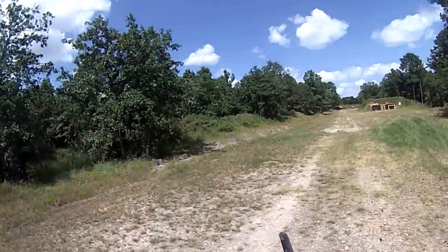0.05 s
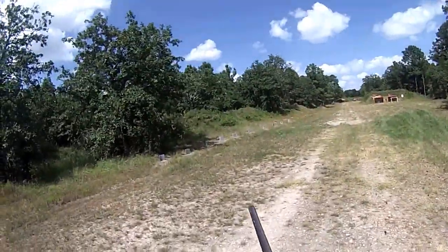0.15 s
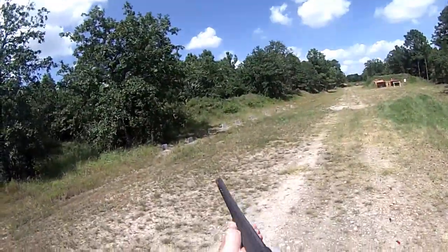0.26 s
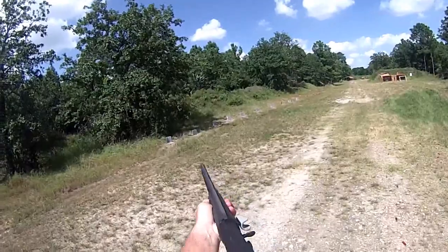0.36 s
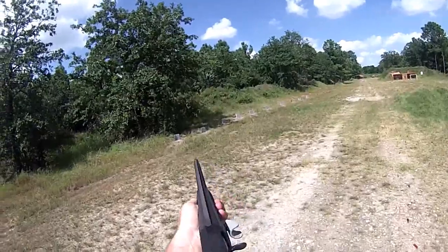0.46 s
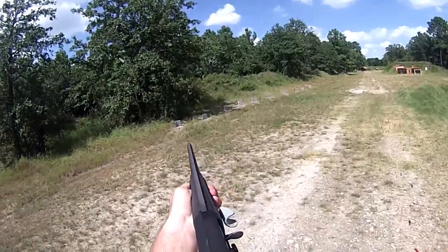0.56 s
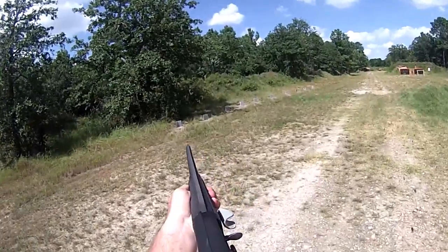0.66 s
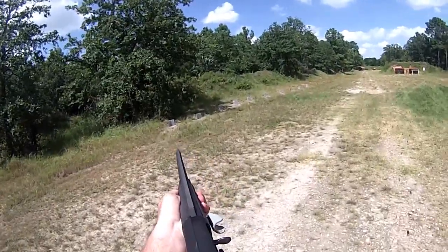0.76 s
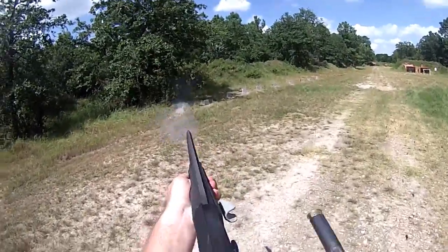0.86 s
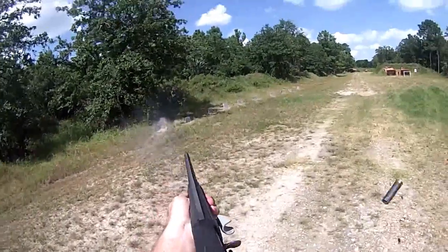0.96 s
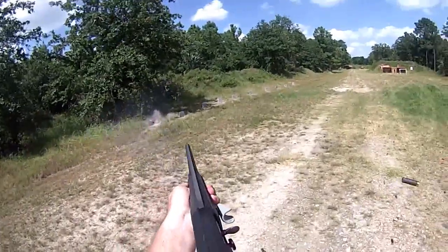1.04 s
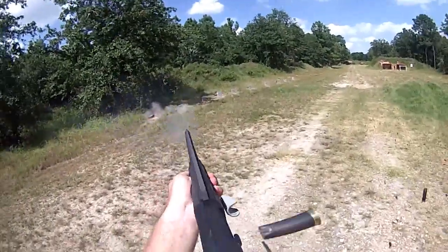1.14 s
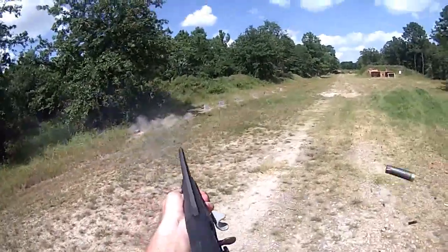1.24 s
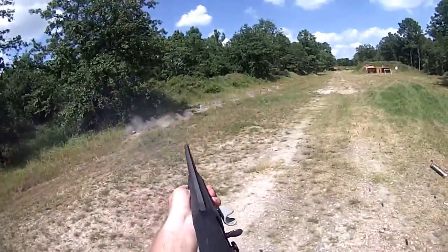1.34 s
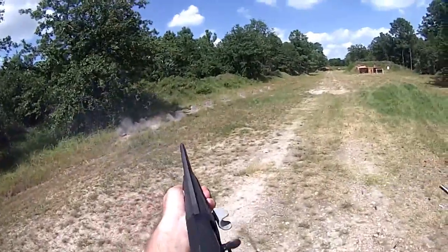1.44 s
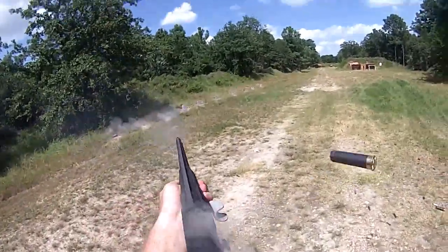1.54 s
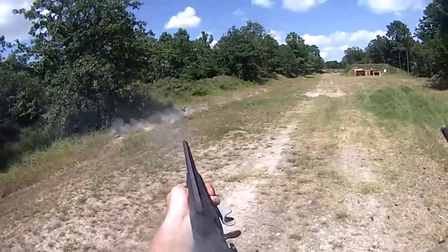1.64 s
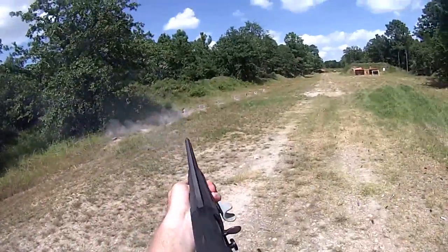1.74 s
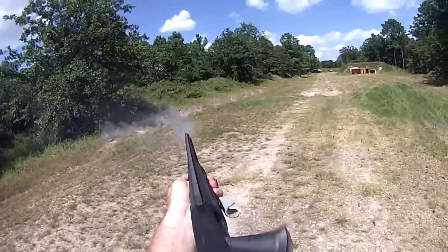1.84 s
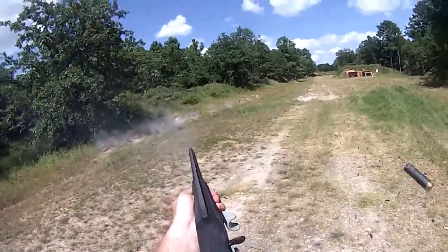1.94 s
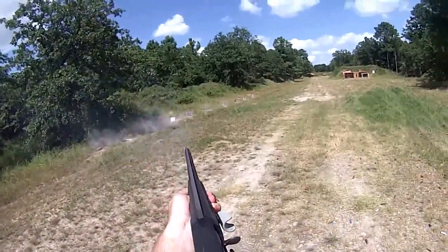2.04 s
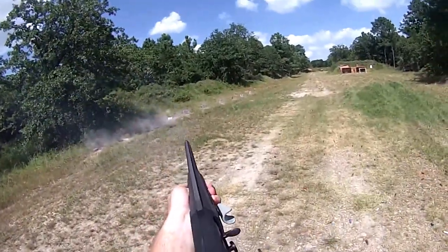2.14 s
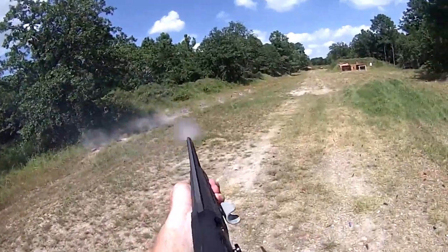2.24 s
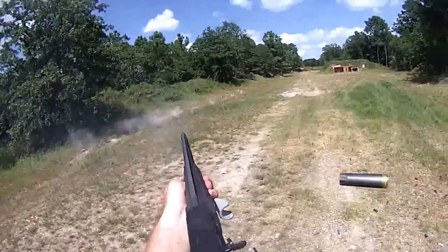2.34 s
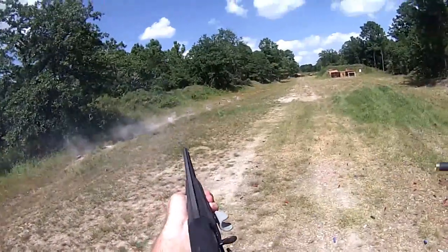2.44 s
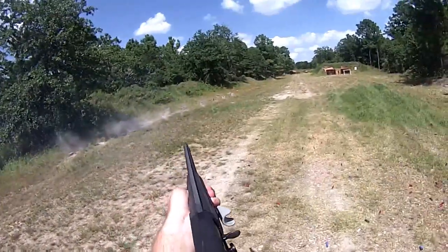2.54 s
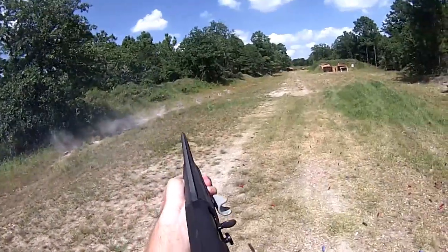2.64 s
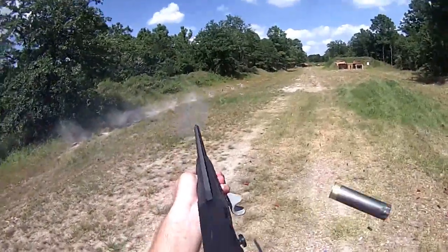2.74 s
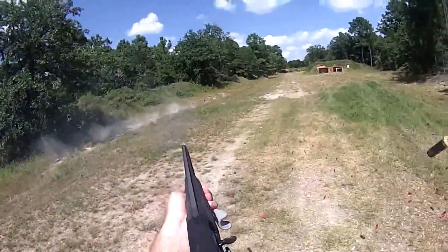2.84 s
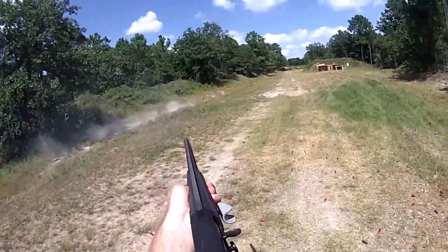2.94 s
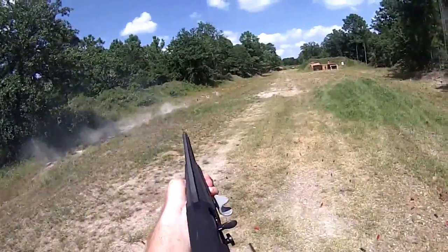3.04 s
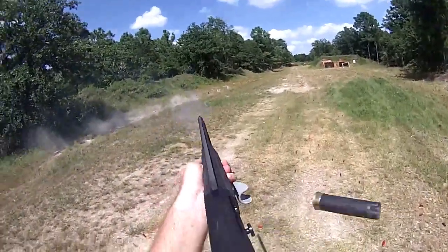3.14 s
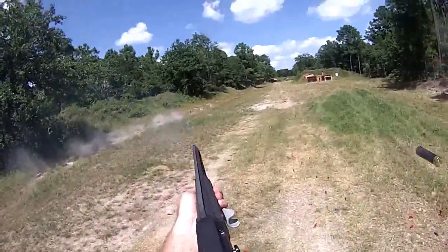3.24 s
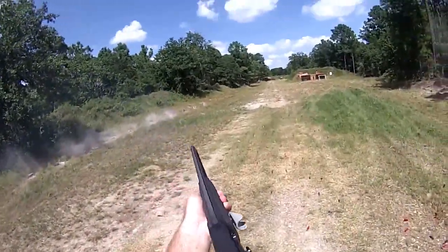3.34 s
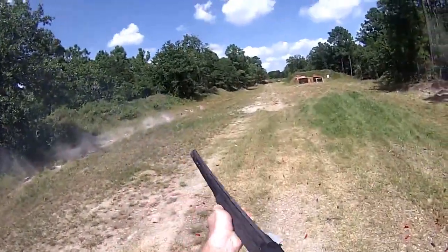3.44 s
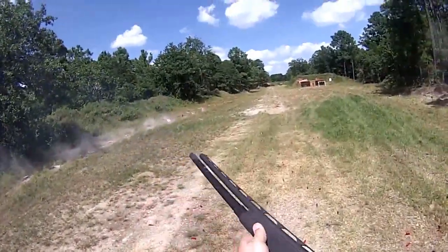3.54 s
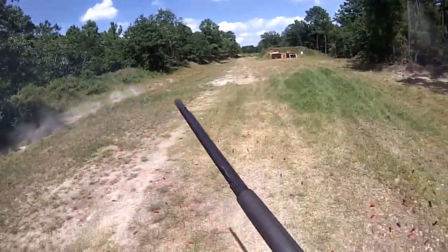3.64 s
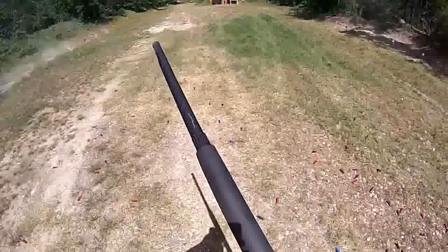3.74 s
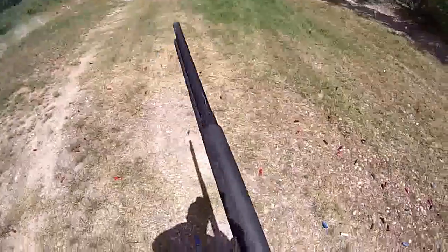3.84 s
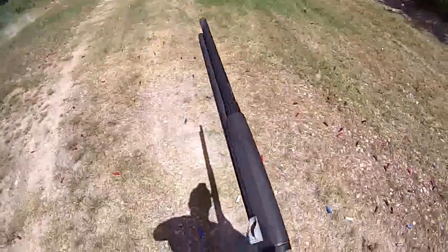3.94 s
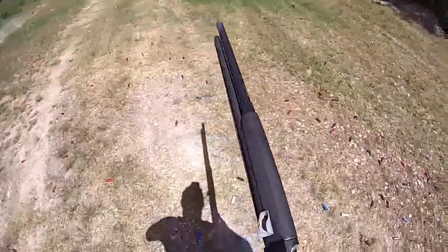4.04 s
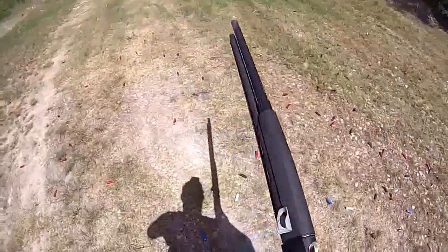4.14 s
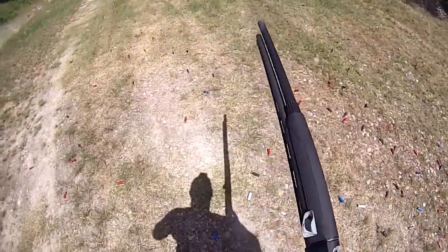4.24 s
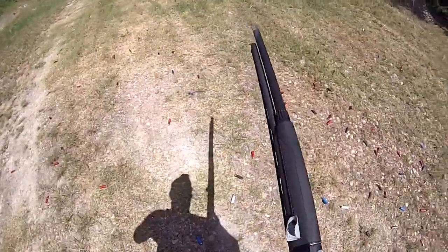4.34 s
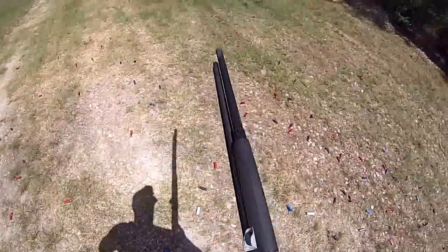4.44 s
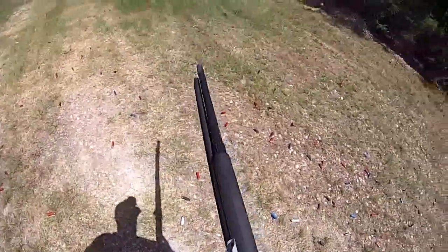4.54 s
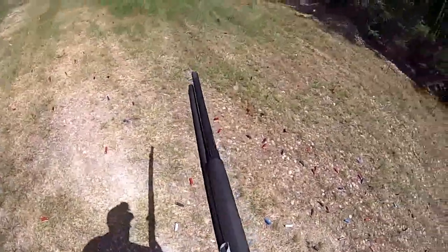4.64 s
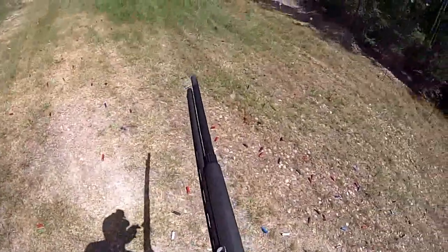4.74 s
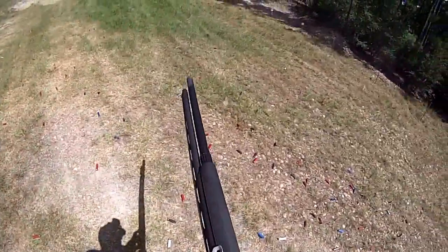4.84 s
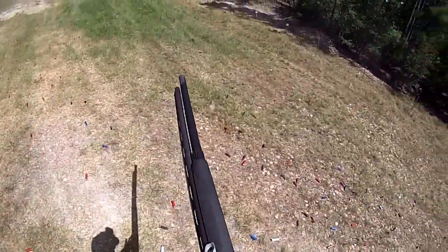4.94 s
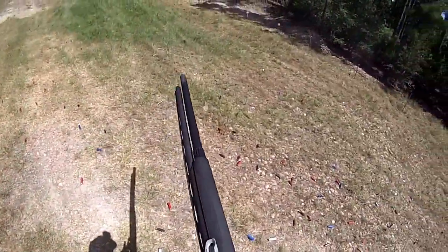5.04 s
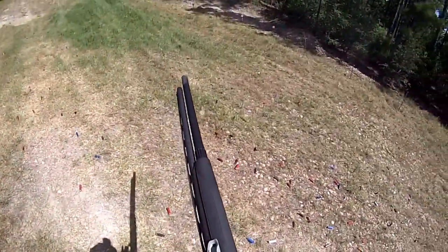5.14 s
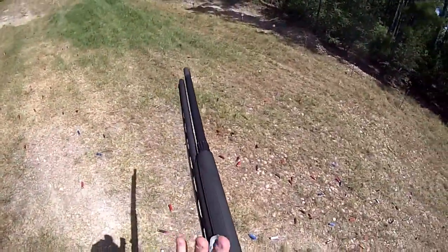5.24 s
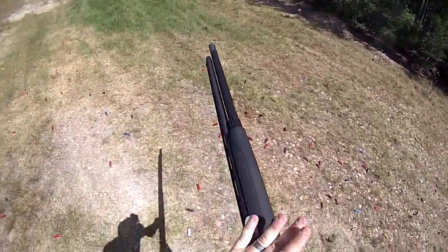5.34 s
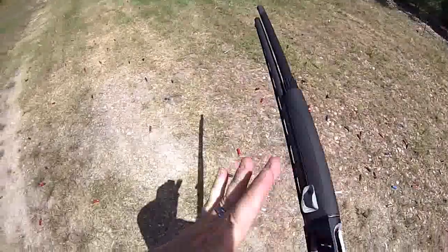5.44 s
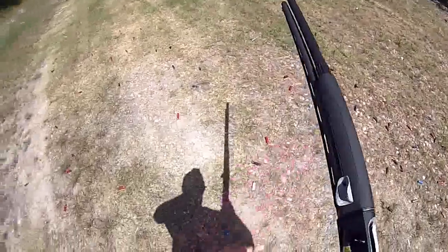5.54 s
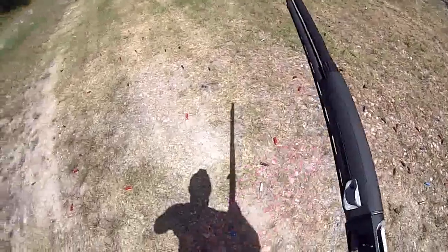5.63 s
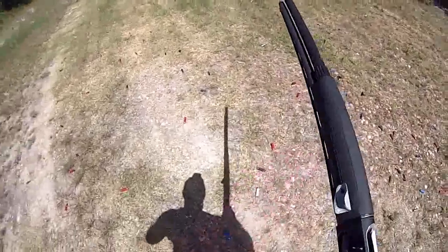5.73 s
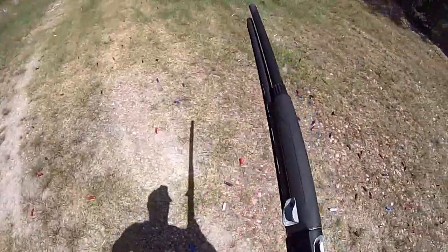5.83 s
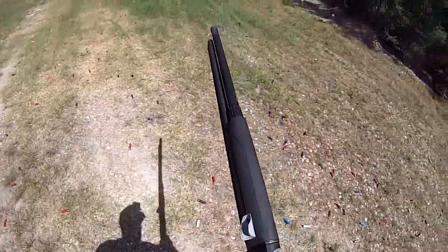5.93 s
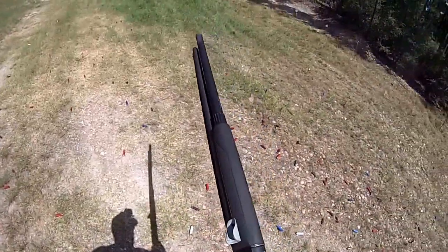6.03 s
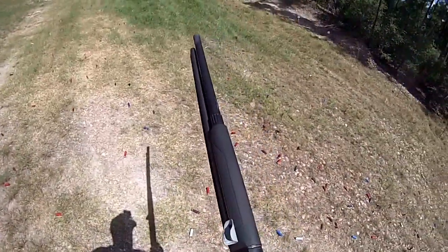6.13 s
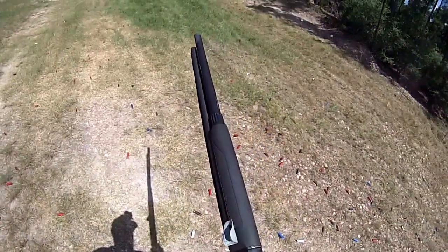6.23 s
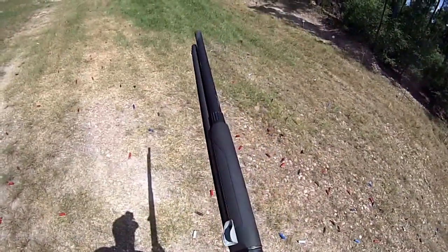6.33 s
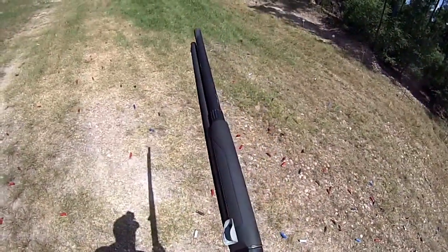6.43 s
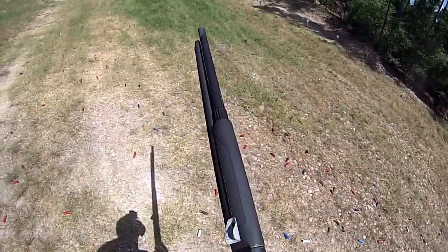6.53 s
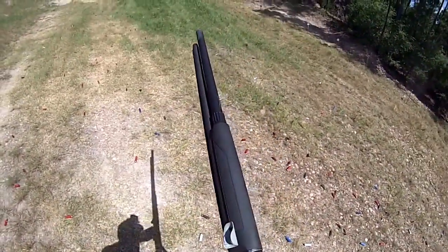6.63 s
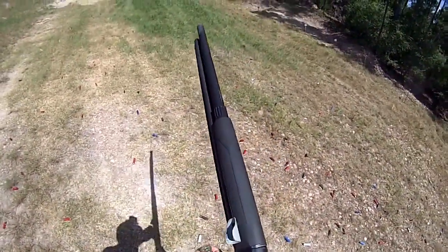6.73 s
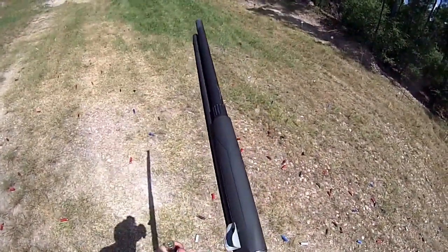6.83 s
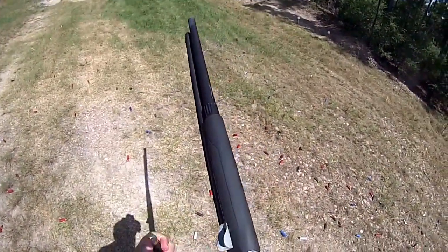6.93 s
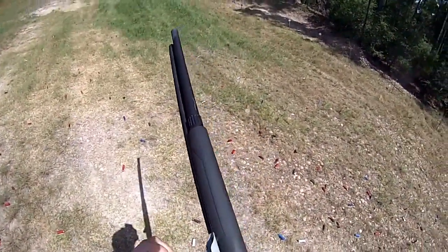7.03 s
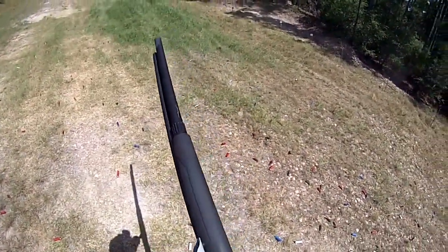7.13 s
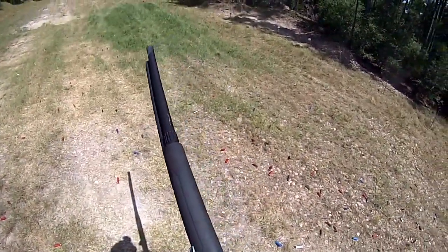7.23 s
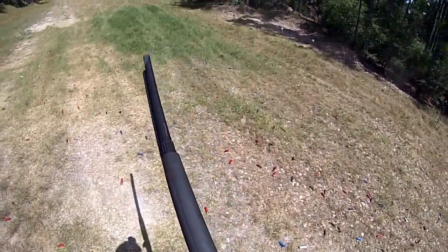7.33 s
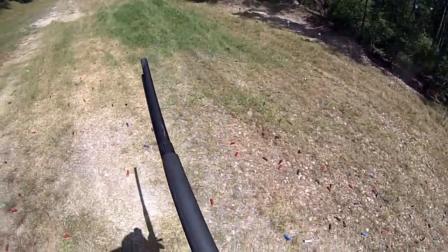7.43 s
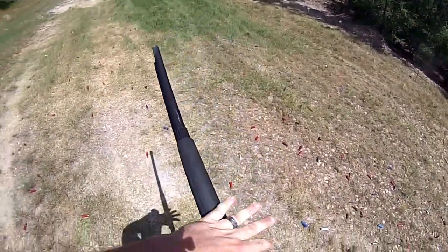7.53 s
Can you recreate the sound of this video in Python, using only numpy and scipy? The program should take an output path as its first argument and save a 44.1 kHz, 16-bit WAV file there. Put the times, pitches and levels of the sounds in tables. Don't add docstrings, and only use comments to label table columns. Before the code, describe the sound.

Seven rapid, overloaded shotgun blasts with metallic bolt clacks and echoes off trees, then shells clicking and sliding into a steel magazine.

```python
import sys
import numpy as np
from scipy import signal
from scipy.fft import rfft, irfft, next_fast_len
from scipy.io import wavfile
from scipy.ndimage import map_coordinates

SR = 44100
rng = np.random.default_rng(int(sys.argv[2]) if len(sys.argv) > 2 else 0)


def unload_wav(signal):
    wavfile.write(
        sys.argv[1],
        SR,
        np.round(np.clip(np.atleast_2d(signal).T, -1, 1) * 32767).astype(np.int16),
    )


def makeup_ratio(level_db):
    decades = np.asarray(level_db, float) / 20
    return 10 ** decades


N = 334278
T = np.arange(N) / SR


def unit(x):
    return x / np.sqrt(np.mean(x ** 2) + 1e-20)


def along(points, hz):
    f, v = np.transpose(points)
    return np.interp(np.log(hz + 1), np.log(f + 1), v)


def wander(rate_hz, t, count):
    return map_coordinates(rng.standard_normal(count), [t * rate_hz])


def filtered(x, response):
    m = next_fast_len(len(x) + 8192)
    return irfft(rfft(x, m) * response(np.fft.rfftfreq(m, 1 / SR)), m)[:len(x)]


def band(x, lo_hz, hi_hz):
    return signal.sosfilt(signal.butter(2, [lo_hz, hi_hz], "band", fs=SR, output="sos"), x)


def add(into, s, x):
    part = into[round(s * SR):][:len(x)]
    part += x[:len(part)]


def fading_noise(seconds, gain_db):
    hz, t, z = signal.stft(rng.standard_normal(int(seconds * SR)), SR, nperseg=256)
    return signal.istft(z * makeup_ratio(gain_db(hz[:, None], t)), SR, nperseg=256)[1]


def held_down():
    held = np.zeros(N)
    for s, *_ in SHOTS:
        held = np.where(T >= s, np.clip(1 - (T - s - .55) / 0.64, 0, 1), held)
    return held


# (frequency [Hz], density [dB per Hz])
AIR = [(59, -29.5), (100, -5), (513, -12.5), (768, -16), (1500, -18.5), (13500, -38.5), (15000, -40.5),
       (16000, -58.5)]
AIR_DB = -57


def air(held):
    hiss = unit(filtered(rng.standard_normal(N), lambda hz: makeup_ratio(along(AIR, hz))))
    low = filtered(hiss, lambda hz: 1 / (1 + (hz / 500) ** 2))
    return makeup_ratio(AIR_DB) * (makeup_ratio(-15 * held) * (hiss - low) + makeup_ratio(-6 * held) * low)


# (time [s], level [dB])
WIND = [(0, -40.5), (.3, -46.5), (.44, -38), (.53, -20.5), (.66, -40.5), (.85, -40), (1.399, -51),
        (3.2, -45), (3.36, -64), (3.55, -42.5), (4.3, -49.5), (5.3, -48.5), (5.42, -31), (5.6, -44.5),
        (6.6, -51), (6.8, -35.5), (7.1, -56), (7.58, -39.5)]
# (frequency [Hz], density [dB per Hz])
RUMBLE = [(12, -3.5), (32, -1), (49, 0.5), (66, -6.5), (87, -27.5), (100, -19.5), (130, -54.5), (220, -120)]
# (time [s], level [dB])
JOLTS = [(0.524, -13), (.575, -21), (5.383, -17), (5.454, -27.5), (5.507, -27.5), (6.737, -25.5),
         (6.823, -26.5), (6.866, -28), (7.543, -31)]
JOLT_HZ, JOLT_S = 39, 0.012
THUD_DB, KICK_THUD_DB, KICK_THUD_T60 = -69.5, -16, 0.35


def wind():
    s, strength_db = np.transpose(WIND)
    gusts_db = 3 * wander(9, T, int(N / SR * 9) + 4)
    buffeting = unit(filtered(rng.standard_normal(N), lambda hz: makeup_ratio(along(RUMBLE, hz))))
    out = makeup_ratio(np.interp(T, s, strength_db) + gusts_db) * buffeting
    stir = makeup_ratio(THUD_DB + 0.65 * gusts_db)
    for s, _, kick_db, *_ in SHOTS:
        stir += (T > s) * makeup_ratio(kick_db + KICK_THUD_DB - 60 * np.abs(T - s) / KICK_THUD_T60)
    out += stir * unit(band(rng.standard_normal(N), 44, 200))
    for s, db in JOLTS:
        out -= makeup_ratio(db) * np.exp(-.5 * ((T - s) / JOLT_S) ** 2) * np.cos(2 * np.pi * JOLT_HZ * (T - s))
    return out


TREES_S, BOUNCE_DB, TREES_DB_PER_S = 0.0067, 2, 55.5
CROWN_S, CROWN_WIDE_S, CROWN_DB, CROWN_HZ = 0.099, .045, 5.5, 3500


def tree_line(hz, t):
    late = np.maximum(t - TREES_S, 0)
    leafy = .6 + .6 * np.exp(-(np.log((hz + 1) / CROWN_HZ) / .5) ** 2)
    crowns = np.exp(-.5 * ((t - CROWN_S) / CROWN_WIDE_S) ** 2) * leafy
    onset = -40 * np.clip(1 - t / TREES_S, 0, 1)
    return onset - 6 + BOUNCE_DB * np.exp(-late / .012) + CROWN_DB * crowns - TREES_DB_PER_S * late


# (frequency [Hz], loss [dB per s])
LEAF_LOSS = [(300, -13), (1500, 12.5), (4000, 24.5), (8000, 37), (15000, 75)]
# (frequency [Hz], t60 [s])
WOODS = [(300, 2.3), (700, 4.3), (1500, 2.4), (3500, 1.9), (6000, 1.3), (12000, 0.48)]


def echoes():
    out = np.zeros(N)
    for s, _, _, echo_db, _ in SHOTS:
        knots = rng.standard_normal((12, 140))
        crackle = rng.standard_normal(520)

        def lumps_db(hz, t):
            lumps = map_coordinates(knots, np.broadcast_arrays(hz / 1500, t * 90))
            return 3.0 * lumps + 2 * map_coordinates(crackle, [t * 350])

        def near_db(hz, t):
            return tree_line(hz, t) - t * along(LEAF_LOSS, hz) + lumps_db(hz, t)

        def far_db(hz, t):
            return -60 * t / along(WOODS, hz) - 30 * np.exp(-t / 0.014) + lumps_db(hz, t)

        add(out, s, makeup_ratio(echo_db + 9.5) * fading_noise(0.76, near_db))
        add(out, s, makeup_ratio(echo_db + 0.5) * fading_noise(1.7, far_db))
    return out


def recoil():
    out, t = np.zeros(N), np.arange(SR // 4) / SR
    swing = np.sin(2 * np.pi * (39.0 * t + 12 * t * t) - 2.3)
    swing *= (1 - np.exp(-t / 0.0092)) / (1 + (t / 0.088) ** 5)
    shove = -t / 0.00078 * np.exp(1 - t / 0.0012)
    for s, _, kick_db, _, shove_db in SHOTS:
        add(out, s, makeup_ratio(kick_db) * swing + makeup_ratio(shove_db) * shove)
    return out


# (start [s], end [s], frequency [Hz], level [dB])
TUBE = [(7.428, 7.47, 2850, -59), (7.465, 7.503, 3500, -58), (7.428, 7.46, 1500, -60),
        (7.51, 7.565, 1480, -50), (7.53, 7.565, 2900, -50)]


def tube():
    out = np.zeros(N)
    for start, end, hz, db in TUBE:
        t = np.arange(0, end - start, 1 / SR)
        breath = 1 + 0.52 * wander(300, t, 64)
        swell = np.sin(np.pi * t / t[-1]) ** .5
        add(out, start, makeup_ratio(db) * breath * swell * np.sin(2 * np.pi * hz * t + 1.6 * breath))
    return out


# (start [s], hold [s], level [dB], brightness [dB])
SLIDES = [(5.377, 0.046, -42, -2), (5.435, .07, -61, -11), (6.729, .03, -43, -16),
          (6.776, 0.0085, -29.5, 5.5), (6.811, 0.069, -53, -15), (7.292, .02, -52, -18),
          (7.414, 0.012, -58, -15), (7.458, .04, -61, 6), (7.506, 0.096, -46.5, 4.5)]
SLIDE_RISE_DB_PER_S, SLIDE_FALL_DB_PER_S = 1500, 799


def slides():
    out = np.zeros(N)
    grain = makeup_ratio(4.05 * wander(300, T, int(N / SR * 300) + 4))
    body = unit(grain * band(rng.standard_normal(N), 950, 4700))
    edge = unit(grain * band(rng.standard_normal(N), 5500, 17000))
    for s, hold, db, bright_db in SLIDES:
        before, after = np.maximum(s - T, 0), np.maximum(T - s - hold, 0)
        off_db = SLIDE_RISE_DB_PER_S * before + SLIDE_FALL_DB_PER_S * after
        out += makeup_ratio(db - off_db) * (body + makeup_ratio(bright_db) * edge)
    return out


# (frequency [Hz], level [dB], free t60 [s])
STEEL = [(1478, -11, 0.7), (1990, -22, 0.1), (2355, -5.5, 0.14), (2916, -1, 0.134), (3720, -6.5, 0.17),
         (4120, -4, 0.13), (5850, -7, 0.14), (6470, -12, 0.1), (8193, -10.5, 0.091), (11150, -23, 0.13)]
DAMPING, STEEL_DB = 0.23, -10


def steel(events):
    out, t = np.zeros(N), np.arange(SR // 8) / SR
    hz, level_db, t60 = np.transpose(STEEL)[:, :, None]
    damped_t60 = DAMPING * np.minimum(t60, .17)
    for s, db, *_ in events:
        new_db = 4 * rng.standard_normal(hz.shape)
        modes = makeup_ratio(db + level_db + new_db - 60 * t / damped_t60) * np.sin(2 * np.pi * hz * t)
        add(out, s, modes.sum(axis=0))
    return makeup_ratio(STEEL_DB) * out


def clicks(events, low_hz, ring_db):
    out, t = np.zeros(N), np.arange(SR // 8) / SR
    for s, db, low_db, high_db, t60, *ring_hz in events:
        n = rng.standard_normal((4, len(t))) * (1 - np.exp(-t / 0.00017))

        def fall(share):
            return makeup_ratio(-60 * t / max(share * t60, .003))

        crack = band(n[0] * (0.67 * fall(0.43) + 0.49 * fall(0.67)), 2300, 5300)
        crack += makeup_ratio(low_db + 2.0) * band(n[1] * fall(0.69), low_hz, 2000)
        crack += makeup_ratio(high_db) * band(n[2] * (0.8 * fall(0.31) + .3 * fall(0.62)), 6400, 11000)
        ring = sum(band(n[3] * fall(0.91), 0.925 * hz, 1.056 * hz) for hz in ring_hz)
        add(out, s, makeup_ratio(db) * (crack + makeup_ratio(ring_db) * ring))
    return out


# (time [s], peak [dB], ring [Hz])
FUMBLES = [(4.244, -53, 1499), (5.062, -48, 1620), (5.863, -49, 2600), (5.967, -46.5, 1495),
           (6.156, -40, 1248)]
# (time [s], peak [dB], ring [Hz])
LATCH = [(4.8933, -28, 3550), (4.9, -35.5, 2440), (4.946, -46, 4000), (5.031, -48, 3950),
         (5.074, -43, 3940), (5.097, -39, 4370), (5.101, -17.5, 3980), (5.113, -32.5, 2400),
         (5.128, -42, 2500), (5.161, -31, 4160), (5.178, -48, 4000), (5.197, -49, 4200),
         (5.209, -46.5, 4300)]
# (time [s], peak [dB], ring [Hz])
RATTLES = [(5.3555, -26, 2840), (5.359, -15.5, 4190), (5.381, -26, 4200), (5.4105, -27, 3930),
           (6.7245, -31, 4270), (6.731, -24, 5800), (6.739, -35, 8500), (6.7445, -26.5, 3800),
           (6.752, -35, 8500), (6.7645, -27, 4130), (6.769, -24, 4070), (6.7743, -12, 2160),
           (6.817, -42, 3630), (7.4255, -36, 4240), (7.4465, -44, 1500), (7.525, -24, 3260),
           (7.572, -15.5, 3400)]
# (time [s], peak [dB], ring [Hz])
SEATINGS = [(5.389, -27.5, 2200), (5.416, -20.5, 1250), (5.417, -26, 680), (6.694, -46, 3040),
            (6.781, -19.5, 3700), (6.789, -18.5, 2740), (6.797, -21.5, 3150), (6.8355, -38, 3250),
            (6.848, -34, 3130), (6.86, -39.5, 3400), (7.2925, -27.5, 2900), (7.311, -38.5, 3500),
            (7.502, -27.5, 3500), (7.521, -28.5, 3350), (7.5685, -27, 3500)]
# (low [dB], high [dB], t60 [s])
FUMBLE, CLICK = (8.6, -24, 0.045), (-9, -26, 0.032)
RATTLE, SEAT = (-12, 0, 0.0367), (-1.5, -0.047, 0.047)


def loading():
    kinds = [(FUMBLES, FUMBLE), (LATCH, CLICK), (RATTLES, RATTLE), (SEATINGS, SEAT)]
    rows = [(s, db, *colour, hz) for hits, colour in kinds for s, db, hz in hits]
    return clicks(rows, low_hz=510, ring_db=7.5) + steel(RATTLES + SEATINGS + LATCH)


# (time [s], time to loudest
# [s], frequency [Hz], level [dB])
HULLS = [(.93, 0.047, 4224, -30.5), (.93, 0.039, 6900, -50), (.92, 0.027, 9900, -57),
         (1.21, 0.031, 4230, -41), (1.215, .03, 4760, -49), (1.58, 0.028, 5960, -48),
         (1.59, 0.049, 10500, -58), (2.37, 0.059, 10000, -57), (2.832, 0.045, 9950, -50),
         (2.83, 0.035, 6850, -54), (5.102, 0.0061, 4390, -39), (5.162, .007, 4300, -51),
         (5.359, 0.0062, 4150, -47)]


def hulls():
    out = np.zeros(N)
    for s, swell, hz, db in HULLS:
        t = np.arange(0, 4.475 * swell, 1 / SR)
        flutter = makeup_ratio(1.2 * wander(50, t, 64))
        turning = t / swell * np.exp(-.45 * (t / swell) ** 2.4)
        add(out, s, makeup_ratio(db + 7.5) * flutter * turning * np.sin(2 * np.pi * hz * t))
    return out


# (time [s], peak [dB])
REAR = [(.9153, -9.5), (.9258, -19.5), (1.211, -13.5), (1.5748, -19.5), (1.953, -17), (2.3783, -19),
        (2.8244, -21), (3.2444, -28)]
# (time [s], peak [dB])
CLOSE = [(0.99, -25), (1.2959, -28), (1.6495, -27.5), (2.0062, -26.5), (2.43, -25.5), (2.8715, -26)]
# (time [s], peak [dB], low [dB])
STRAYS = [(2.2653, -30, -9), (2.5474, -41, 2), (2.9946, -32, -17), (3.6043, -50, 7), (3.8255, -46, -6),
          (3.858, -42, -7)]
# (time after the blast [s], peak [dB], t60 [s])
BANKS = [(0.169, -40, 0.078), (.181, -37, 0.035), (0.21, -41.5, 0.027), (.237, -44, 0.034),
         (.292, -43, .05), (.372, -44, .04)]
UNLOCK_S, UNLOCK_DB = .0262, -19
# (low [dB], high [dB], t60 [s]); strays bring their own low
UNLOCK, STOP, SHUT, STRAY = (-9.5, 0, 0.02), (-9, 0, 0.0336), (-18, 1, 0.097), (3, 0.022)
BANK_LOW_DB, BANK_HIGH_DB = 6, -22


def bolt():
    rows = [(s + UNLOCK_S, UNLOCK_DB, *UNLOCK) for s, *_ in SHOTS]
    rows += [(*hit, *STOP) for hit in REAR]
    rows += [(*hit, *SHUT) for hit in CLOSE]
    rows += [(*hit, *STRAY) for hit in STRAYS]
    for s, *_ in SHOTS:
        rows += [(s + after, db, BANK_LOW_DB, BANK_HIGH_DB, t60) for after, db, t60 in BANKS]
    return makeup_ratio(11.5) * clicks(rows, low_hz=804, ring_db=0)


# (time [s], overload [dB], recoil [dB], echo [dB], low shove [dB])
SHOTS = [
    (0.8674, 10.5, -25.5, -27.5, -19),
    (1.1609, 7, -25.5, -29, -34),
    (1.518, 6.5, -22.5, -29, -33),
    (1.8883, 7, -25, -29.5, -14),
    (2.3103, 8, -26.5, -29.5, -39.5),
    (2.7465, 6.5, -26.5, -29.5, -36),
    (3.1564, 9.5, -25, -30, -32),
]


def blasts():
    out, t = np.zeros(N), np.arange(SR // 20) / SR

    def tone(hz):
        return np.sin(2 * np.pi * hz * t)

    for s, over_db, *_ in SHOTS:
        u = t / 0.00031
        gas = rng.standard_normal(len(t)) * makeup_ratio(-60 * t / 0.015)
        blast = makeup_ratio(over_db) * (5.5 * (1 - u) * np.exp(-u) + 1.7 * gas)
        blast += makeup_ratio(over_db + 10.0) * tone(4700) * makeup_ratio(-60 * t / 0.0029)
        blast += makeup_ratio(over_db - 14.0) * tone(3700) * makeup_ratio(-60 * t / .016)
        add(out, s + .0005, makeup_ratio(over_db + 4) * tone(1600) * makeup_ratio(-60 * (t / 0.0023) ** 1.8))
        add(out, s, blast)
        ground = band((1 - u / 3) * np.exp(-u / 3), 370, 1500)
        add(out, s + .0068, makeup_ratio(-23.5) * blast + makeup_ratio(over_db - 6.0) * ground)
        hammer = rng.standard_normal(len(t)) * (t < .0046) * (1 - np.exp(-t / 0.00042))
        hammer_ring = band(hammer, 7500, 8500) * makeup_ratio(-60 * t / 0.013)
        add(out, s - .0046, makeup_ratio(-6.0) * hammer + makeup_ratio(4) * hammer_ring)
        add(out, s - .0115, makeup_ratio(-41.5) * hammer)
    return out


# (frequency [Hz], width [Hz], level [dB])
HOUSING = [(296, 180, -15.5), (675.7, 340, -7.5), (1500, 400, -0.5), (2313, 330, -1.5), (2900, 260, -3),
           (3497, 360, -1.5), (4321, 420, -3.5), (4806, 1000, -7.5), (6500, 1900, -12), (8500, 890, -12),
           (11600, 3000, -18.5)]


def housing(f):
    return sum((-1) ** k * makeup_ratio(db) * 1j * f * w / (c * c - f * f + 1j * f * w)
               for k, (c, w, db) in enumerate(HOUSING))


# (frequency [Hz], level [dB])
BELOW = [(300, -9), (1200, 0), (4000, 2.5), (6500, -4), (8500, -1), (10500, -13.5), (12800, -9.5),
         (16000, -11.5)]


def scene():
    held = held_down()
    blast = filtered(blasts(), housing)
    overloaded = 1.086 * blast / (1 + np.abs(blast) ** 4) ** (1 / 4)
    squashed = band(band(overloaded, 250, 12000), 250, 18000)
    range_sound = filtered(echoes() * makeup_ratio(6.7 * (1 - held)) + bolt(), housing)
    hands = filtered(loading() + slides() + tube(), lambda hz: makeup_ratio(along(BELOW, hz)))
    return (squashed + range_sound + hands + hulls() + recoil() + wind() + air(held))[None]


def low_pass(x):
    return signal.sosfilt(signal.butter(12, 16420, fs=SR, output="sos"), x)


def record(dry):
    limited = filtered(np.clip(dry[0], -1, 1), lambda hz: 1 / (1 + (hz / 15100) ** 44))
    return low_pass(.94 * limited[None])


dry = scene()
out = record(dry)
unload_wav(out)
```